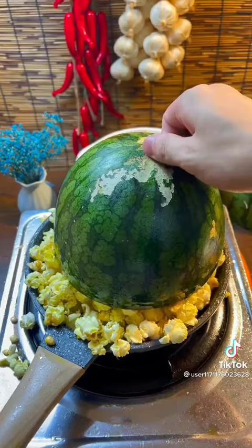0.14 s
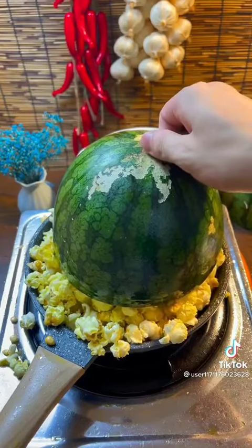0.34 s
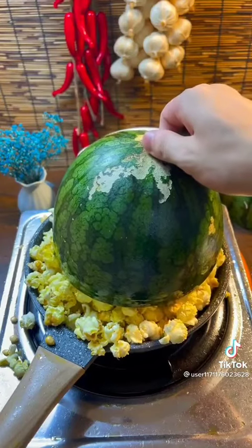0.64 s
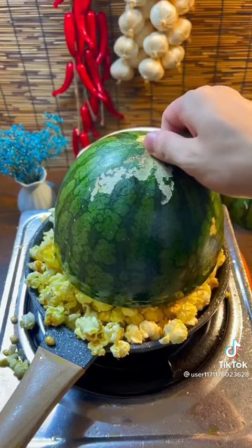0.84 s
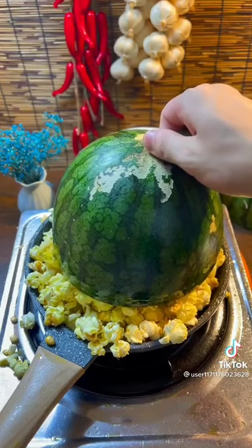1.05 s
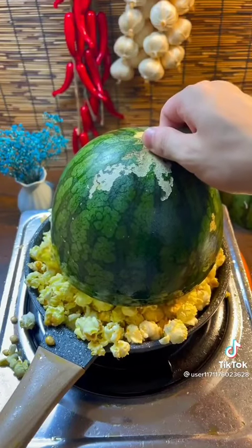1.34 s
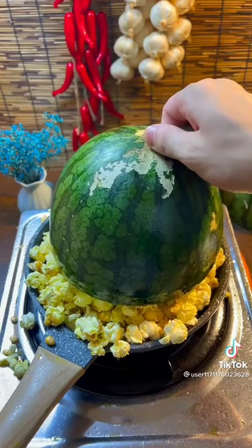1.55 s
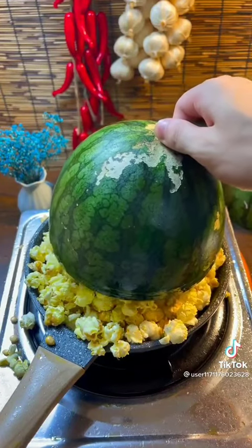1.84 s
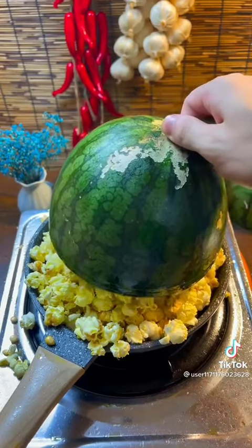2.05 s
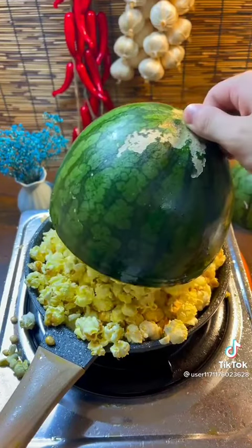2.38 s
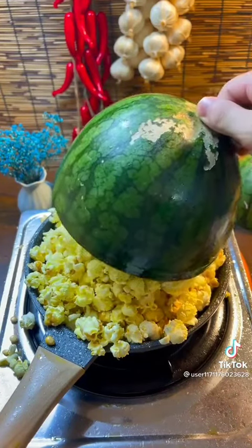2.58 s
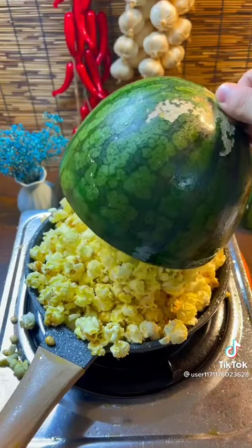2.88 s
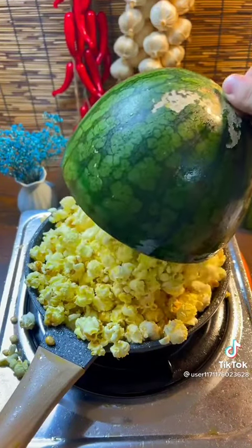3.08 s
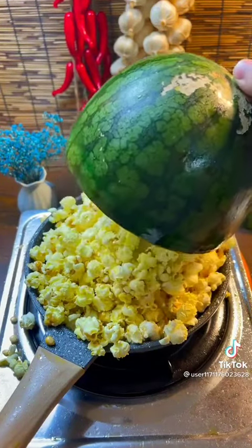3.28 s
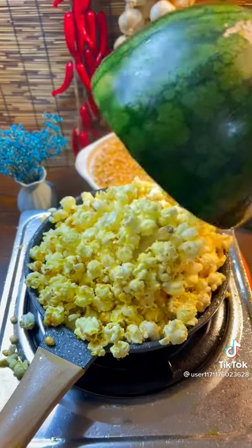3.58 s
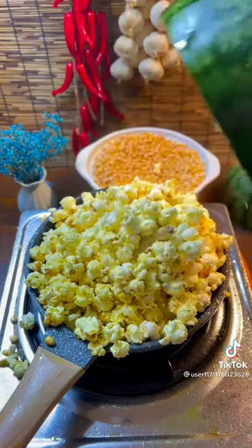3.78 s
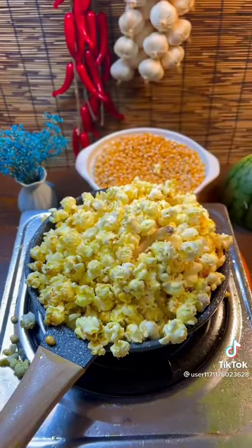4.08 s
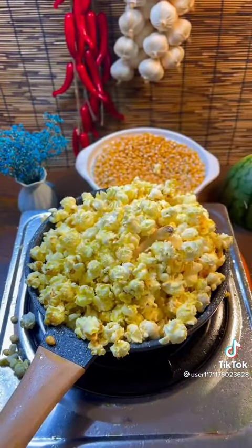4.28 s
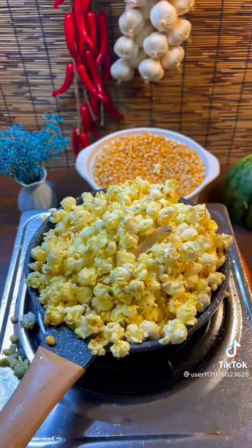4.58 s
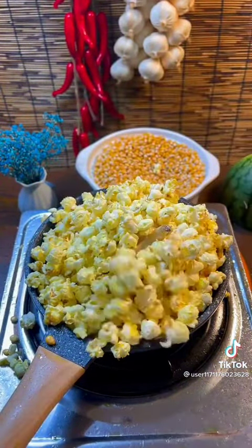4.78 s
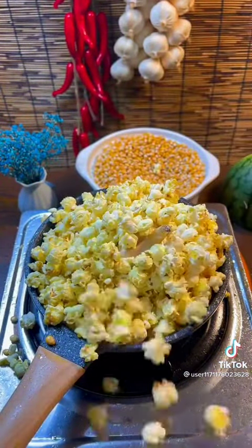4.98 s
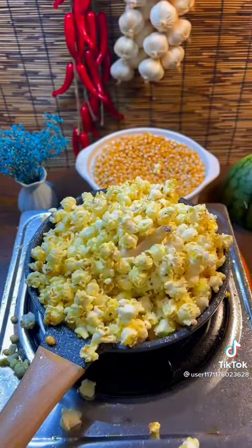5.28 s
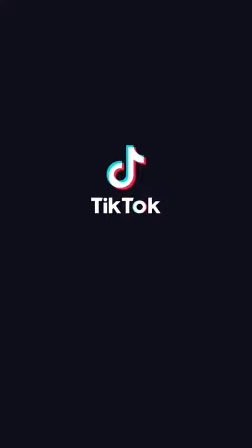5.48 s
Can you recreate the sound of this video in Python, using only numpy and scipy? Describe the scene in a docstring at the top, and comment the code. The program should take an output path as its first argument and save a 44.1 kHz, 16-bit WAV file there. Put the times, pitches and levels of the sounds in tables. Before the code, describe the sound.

A close phone capture in a small kitchen. A brief burst of oil sizzle opens it and drops within 0.2 s to a faint hiss with tiny spits, dry rustling and a low, wavering stove hum near 48 Hz. From 0.15 to 1.5 s small kernels crack softly and irregularly, each followed by a little hiss of jostling flakes; dry ticks come near 1.5 and 1.9 s. Pops thin out to about 2.9 s, with breathy swishes at the start and around 0.3, 1.5 and 3.3-3.8 s. A firmer cluster of cracks comes at 3.35-3.6 s, then near calm. At 4.43 s a very loud sharp double crack echoes briefly, a muffled thud follows at 4.71 s, and a lesser sharp crack at 4.92 s, each with a bass swell. From 5.0 to 5.3 s flakes slide in bright grainy hiss and ticks, drumming hollowly on sheet steel. They fade before an abrupt stop at 5.58 s.

```python
"""Popcorn in a hot pan on a stove in a small kitchen, close to a phone microphone.
From the start oil sizzles over dry rustling, a low stove rumble and airy swishes: all shaped noise, plus a hum.
Under a rind held as a lid, kernels crack softly: noise bursts ring resonances, then jostling flakes hiss.
Later, with the lid off, three loud pops (two sharp with echoes, one dull) throw flakes about; last, the heap
slides as grainy hiss and ticks, and flakes drum on the steel stove top, ringing its modes."""
import sys
import numpy as np
from scipy import signal
from scipy.fft import rfft, irfft
from scipy.io import wavfile
from scipy.ndimage import uniform_filter1d

SR = 44100
rng = np.random.default_rng(int(sys.argv[2]) if len(sys.argv) > 2 else 0)


def to_linear_factor(level_db):
    """Convert decibel levels (scalar or array-like) to linear amplitude factors."""
    exponent = np.asarray(level_db, float) / 20
    return 10 ** exponent


def put_to_file(sound):
    """Save the sound as 16-bit audio at rate SR, in the file named by the first command-line argument."""
    columns = np.atleast_2d(sound).T  # one column per channel
    safe = np.clip(columns, -1, 1)
    whole_steps = np.round(safe * 32767)
    wavfile.write(sys.argv[1], SR, whole_steps.astype(np.int16))


N = 248283
END_S = 5.578  # the recorder stops


def evened(x):
    """Scales to rms 1."""
    return x / np.sqrt(np.mean(x ** 2) + 1e-20)


def spectrum_at(points, hz):
    """Reads a spectrum table on a log-frequency axis."""
    f, value = np.transpose(points)
    return np.interp(np.log(hz + 1), np.log(f + 1), value)


def curve(rows, column=1):
    """One column of a table, read against its time column at every sample."""
    rows = np.array(rows)
    return np.interp(np.arange(N) / SR, rows[:, 0], rows[:, column])


def colour(x, points):
    """Filters by a spectrum table."""
    gain = to_linear_factor(spectrum_at(points, np.fft.rfftfreq(len(x), 1 / SR)))
    return irfft(rfft(x) * gain, len(x))


def add(mix, start_s, sound):
    """Lays a sound into the mix at start_s."""
    part = mix[round(start_s * SR):][:len(sound)]
    part += sound[:len(part)]


def play(mix, rows, sound, lead_s=0):
    """Lays in one sound per table row, lead_s early to leave room for its rise."""
    for start_s, *row in rows:
        add(mix, start_s - lead_s, sound(*row))


def ring(x, modes):
    """Passes x through fixed resonances of alternating sign."""
    out = np.zeros(len(x))
    for k, (hz, width_hz, db) in enumerate(modes):
        b, a = signal.iirpeak(hz, hz / max(width_hz, 5), SR)
        out += (-1) ** k * to_linear_factor(db) * signal.lfilter(b, a, x)
    return out


def grains(size, per_s, spread_db):
    """Sparse clicks of random sign, a few of them large."""
    draw = rng.random((size, 3))
    heights = to_linear_factor(-spread_db * np.log(np.maximum(draw[:, 0], .02)))
    return heights * np.sign(draw[:, 1] - .5) * (draw[:, 2] < per_s / SR)


def patchy(points, patchy_db, size=512):
    """Coloured noise whose short-time spectrum drifts in patches."""
    frames, hz = 4 * N // size + 5, np.fft.rfftfreq(size, 1 / SR)
    a, b, patches = rng.standard_normal((frames, len(hz), 3)).T
    patches = uniform_filter1d(patches, size=6, axis=0)
    patches = evened(uniform_filter1d(patches, size=10, axis=1))
    z = (a + 1j * b) * to_linear_factor(spectrum_at(points, hz)[:, None] + patchy_db * patches)
    return evened(signal.istft(z, nperseg=size, noverlap=3 * size // 4)[1][:N])


def drift(rate_hz):
    """Slow chance of rms 1: sines of random phase up to rate_hz, the slower ones stronger."""
    t = np.arange(N) / SR
    rates = np.geomspace(rate_hz / 10, rate_hz, 16)
    return evened(sum(np.sin(2 * np.pi * (f * t + rng.random())) / np.sqrt(f) for f in rates))


# how busy the pan is: time_s, sizzle_db, roar_db
SIZZLE = [(0.0, -45.5, -49.5), (0.07, -54, -54.5), (0.2, -62.5, -58.5), (0.38, -62.5, -58),
          (0.52, -68, -58.5), (1.2, -65.5, -57.5), (1.72, -68, -58.5), (2.3, -68, -61.5),
          (3.05, -69.5, -62.5), (3.33, -66, -58), (3.53, -61.5, -53), (3.87, -66.5, -59), (4.4, -72.5, -64),
          (4.6, -64, -59), (4.85, -69, -57), (4.98, -60, -54), (5.1, -52.5, -44.5), (5.24, -51.5, -48.5),
          (5.44, -68, -57.5), (5.58, -70.5, -58)]
# the hiss of hot oil near the microphone: freq_hz, level_db (per Hz)
SIZZLE_COLOUR = [(880, -21), (1500, -6), (1910, -14), (2380, -2), (2940, -4), (3820, -14), (4540, -7),
                 (5560, -11.5), (6360, -8), (10600, -12), (12300, -6.5), (14300, -17.5), (15000, -49.5)]


def sizzle():
    """Oil hiss with tiny spits; the fizz on top follows it, as steam and tumbling flakes come and go."""
    spit = rng.standard_normal(300) * np.exp(-np.arange(300) / 39.0)
    spits = signal.oaconvolve(grains(N, per_s=450, spread_db=5.5), spit)
    spits = evened(colour(spits[:N], SIZZLE_COLOUR))
    hiss = patchy(SIZZLE_COLOUR, patchy_db=2.5) + .45 * spits
    body = colour(hiss, [(5000, -0.5), (7000, -41.0)])
    fizz = evened(hiss - body)
    sizzle_db = curve(SIZZLE)
    fizz_db = -71 + 1.145 * (sizzle_db + 68.5)  # -71 dB when the sizzle is at a calm -68.5 dB
    return to_linear_factor(sizzle_db) * evened(body) + to_linear_factor(fizz_db) * fizz


def rustle():
    """Dry rubbing: noise in a broad band that rises and falls with the roar."""
    rustle_db = -71 + 1.14 * (curve(SIZZLE, column=2) + 62)  # -71 dB when the roar is at a calm -62 dB
    rubbing = [(200, -8), (500, 6.0), (1400, 1.5), (2000, -9.5), (4000, -38.0)]
    return to_linear_factor(rustle_db) * patchy(rubbing, patchy_db=1.8)


# low stove rumble before lumps and swells: time_s, level_db
RUMBLE = [(0.0, -46), (0.19, -48), (0.29, -55), (0.48, -50.5), (0.68, -61.5), (0.92, -49.5), (1.5, -48),
          (1.63, -59), (2.3, -57), (2.5, -54.5), (2.95, -58.5), (3.55, -53.5), (4.3, -60.5), (5.1, -51.5),
          (5.58, -51.5)]
# noise around the hum: freq_hz, level_db (per Hz)
RUMBLE_COLOUR = [(20, -12), (35, 1), (50, -1), (70, -2), (90, -9), (140, -35)]
# the flame's roar: freq_hz, level_db (per Hz)
ROAR_COLOUR = [(53, -43.5), (90, -15), (102, -8), (135, 3), (189, -4.5), (210, -9.5), (243, 2), (327, -7),
               (350, -5), (437, -10), (491, -14), (530, -14), (900, -16.5), (1170, -68.5), (1980, -120)]
# after each loud burst the phone's gate opens and the low rumble swells: start_s, level_db (at the top), swell_s
SWELLS = [(4.43, -38, 0.071), (4.712, -42, 0.028), (4.915, -37.5, 0.043)]


def stove():
    """A wavering low hum in lumpy noise, which swells after each loud burst, and the flame's dull roar."""
    t = np.arange(N) / SR
    hum_hz = 48.1 + 1.3 * drift(rate_hz=3)
    hum = np.sqrt(2) * np.sin(2 * np.pi * np.cumsum(hum_hz) / SR)
    level = to_linear_factor(curve(RUMBLE) + 1.5 * drift(rate_hz=9))  # lumps of 1.5 dB rms
    for start_s, db, swell_s in SWELLS:
        u = np.maximum(t - start_s, 0) / swell_s
        level = level + to_linear_factor(db) * (u * np.exp(1 - u)) ** 2
    rumble = level * evened(hum + 0.71 * patchy(RUMBLE_COLOUR, patchy_db=.6, size=4096))
    roar = to_linear_factor(curve(SIZZLE, column=2)) * patchy(ROAR_COLOUR, patchy_db=1.0, size=2048)
    return rumble + roar


def swish(length_s, level_db, first_hz, last_hz):
    """Airy and faintly whistling: noise in a narrow band that glides."""
    t = np.arange(0, length_s, 1 / SR)
    hz = first_hz + (last_hz - first_hz) * t / length_s
    turn = np.exp(2j * np.pi * np.cumsum(hz) / SR)
    r = np.exp(-np.pi * 300 / SR)
    # shift the band down to 0 Hz, smooth it there, shift it back
    low = signal.lfilter([(1 - r) ** 2], [1, -2 * r, r ** 2], rng.standard_normal(len(t)) / turn)
    return to_linear_factor(level_db) * evened((turn * low).real) * signal.windows.tukey(len(t), .6)


# airy swishes: start_s, length_s, level_db, first_hz, last_hz
SWISHES = [(0.0, 0.093, -54.5, 1470, 1400), (0.329, .22, -59.5, 1217, 1430), (1.531, 0.27, -64, 1130, 1390),
           (1.79, .09, -66.5, 830, 800), (3.271, 0.079, -64, 1520, 1530), (3.41, .09, -57, 1280, 1250),
           (3.61, 0.068, -60.5, 1110, 1070), (3.699, 0.19, -64, 1310, 1190)]


def swishes(mix):
    """Lays in every swish."""
    play(mix, SWISHES, swish)


# a bursting hull, two modes of crack and then three of hiss: freq_hz, width_hz, level_db
CRACK = [(2680, 890, 21), (4500, 400, -35), (6120, 1250, 1.5), (9000, 2100, -1), (12100, 1750, 4)]
# the heap under a burst: freq_hz, width_hz, level_db
THUMP = [(700, 500, -7), (1350, 210, -4)]


def pop(crack_db, thump_db, hiss_db, scatter_db):
    """The hull splits in a few ms of cracks; the heap thumps; flakes jostle and settle."""
    t = np.arange(SR // 4) / SR
    noise = rng.standard_normal((len(t), 3)).T
    rise = 1 - np.exp(-t / 0.0003)
    second = 0.3 * (t > .0035) * np.exp(-abs(t - .0035) / 0.0013)
    split = noise[0] * rise * (np.exp(-t / 0.0014) + second)
    crack = ring(split, CRACK[:2])
    hiss = ring(split, CRACK[2:])
    thump = ring(noise[1] * rise * np.exp(-t / 0.0073), THUMP)
    parts = ((0, crack), (thump_db, thump), (hiss_db, hiss))
    burst = sum(to_linear_factor(db) * v / abs(v).max() for db, v in parts)
    nudges = signal.lfilter([1], [1, -.985], abs(grains(len(t), per_s=160, spread_db=3.5)))
    jostle = evened(colour(noise[2], SIZZLE_COLOUR)) * evened(0.88 + nudges)
    settle = to_linear_factor(-60 * t / 0.12) * (1 - np.exp(-t / 0.0029))  # at rest (-60 dB) after 0.12 s
    return to_linear_factor(crack_db) * (burst + to_linear_factor(scatter_db) * jostle * settle)


# kernels bursting deep in the heap: start_s, crack_peak_db, then re the crack: thump_db, hiss_db,
# scatter_db (before it settles)
POPS = [(0.151, -35, -20, 5.5, -16), (0.1705, -39, -20, 8, -8.5), (0.1965, -47, -20, 1.5, -10),
        (0.2374, -47, -22, 3, -8), (0.4332, -46.5, -15, -2, -11), (0.4485, -43.5, -20, 7, -13),
        (0.5757, -31, -16, -9, -11.5), (0.623, -45.5, -13, 0, -11), (0.635, -45.5, -20, -8, -9),
        (0.7621, -39.5, -13, 4, -2.5), (0.9008, -41.5, -22, 4, -9), (0.9203, -39, -10.5, -3, -11),
        (0.9803, -42, -17, 4, -10), (1.0103, -40.5, -24, 2.5, -13), (1.0505, -45, -20, -3, -9),
        (1.1302, -36, -25, 6, -11), (1.211, -45, -20, 4.5, -9), (1.2458, -47, -20, 1.5, -5.5),
        (1.2703, -42.5, -20, 3, -5.5), (1.3167, -39.5, -20, 4, -12), (1.4326, -44, -14.5, -0.5, -13),
        (1.47, -48, -20, 4, -15), (1.488, -40.5, -23, 1, -5), (1.92, -48.5, -18, 6, -7),
        (2.0334, -48, -20, -6, -9), (2.1008, -38.5, -19, 0.5, -14.5), (2.127, -43, -12, 0, -5.5),
        (2.3786, -48, -17, 7.5, -7), (2.551, -48, -20, -13, -17), (2.66, -50, -18, -9, -19),
        (2.765, -50.5, -20, -2.5, -8), (2.851, -50, -20.5, 4, -11), (3.342, -33.5, -6.5, -3, -14),
        (3.3892, -33, -8.5, 0.5, -10), (3.42, -42.5, -17, -7, -5), (3.4655, -41.5, -20, 4, -5),
        (3.5848, -48, -18, 5.5, -11), (3.6127, -40, -20, 6.5, -14), (4.0761, -40.5, -17, 3, -10)]


def pops(mix):
    """Lays in the kernels in the heap, and 26 faint ones at its bottom at random moments."""
    play(mix, POPS, pop, lead_s=.0008)
    for when, size, bright in rng.random((26, 3)):
        add(mix, when * END_S, pop(-54.5 + 5 * size, -20, 12 * bright - 9, -11))


def tick(peak_db, centre_hz):
    """A few ms of bright noise, narrowed twice by one wide resonance."""
    t = np.arange(SR // 20) / SR
    mode = [(centre_hz, 0.86 * centre_hz, 0)]
    noise = rng.standard_normal(len(t)) * (1 - np.exp(-t / 0.0004)) * np.exp(-t / 0.0027)
    click = ring(ring(noise, mode), mode)
    return to_linear_factor(peak_db) * click / abs(click).max()


# dry flakes ticking on each other: start_s, peak_db, centre_hz
TICKS = [(1.469, -40, 11000), (1.498, -33.5, 12000), (1.512, -42, 4500), (1.92, -35, 10100),
         (1.93, -42, 9000), (2.397, -47, 11000), (4.09, -47, 10000), (4.688, -46, 8000), (4.89, -50, 7000),
         (4.949, -32, 4240), (5.045, -34, 11800), (5.062, -32, 12300), (5.078, -31, 12100),
         (5.097, -35, 11200), (5.236, -32, 11600), (5.254, -26.5, 11200), (5.263, -29, 12600),
         (5.42, -40.5, 11000)]


def ticks(mix):
    """Lays in every tick of flake on flake."""
    play(mix, TICKS, tick, lead_s=.0006)


# a loud burst in the open: freq_hz, level_db (per Hz)
BANG = [(59, -41), (100, -7.5), (513, -2.5), (1140, 1.5), (1840, -9.5), (2630, -1.5), (3840, -9.5),
        (6350, -14), (8000, -14.5), (9660, -11.5), (11900, -16), (13800, -18), (15000, -45.5)]
# the kitchen and pan answering a bang: freq_hz, level_db (per Hz)
SCATTER = [(18, -27), (30, -1.5), (132, -11), (158, -13), (228, 4.5), (267, -13.5), (552, -20), (859, -6),
           (1110, -4.5), (1780, -15), (2430, -10.5), (2990, -14), (9150, -25), (13900, -36.5),
           (15000, -64.5)]
# how long the echo lingers: freq_hz, factor on echo_t60_s
LINGER = [(50, 1.4), (250, 1.32), (1000, 1.15), (4000, 0.98), (12000, 1.0)]


def bang(peak_db, tilt_db, split_s, echo_db, t60_s):
    """A double crack, then a dense echo whose bass lingers longest, cut short after a sixth of a second
    by the phone's noise gate."""
    t = np.arange(SR // 2) / SR
    noise = rng.standard_normal((len(t), 2)).T
    fall_s = 0.33 * max(split_s, .001)
    cracks = sum(share * (t > s) * np.exp(-abs(t - s) / fall_s) for s, share in ((0, 1), (split_s, .45)))
    tilt = [(100, -3 * tilt_db), (12800, 4 * tilt_db)]
    burst = colour(colour(noise[0] * (1 - np.exp(-t / 0.00055)) * cracks, BANG), tilt)
    answer = evened(colour(colour(noise[1], SCATTER), tilt))
    hz, frame_s, z = signal.stft(answer, SR, nperseg=256)
    band_t60_s = np.maximum(t60_s * spectrum_at(LINGER, hz)[:, None], .01)
    echo = signal.istft(z * to_linear_factor(-60 * frame_s / band_t60_s), SR, nperseg=256)[1][:len(t)]
    gate = 1 / (1 + (t / .16) ** 6)
    echo = echo * (1 - np.exp(-t / 0.0028)) * gate
    return to_linear_factor(peak_db) * (burst / abs(burst).max() + to_linear_factor(echo_db) * echo)


# loud bursts in the open: start_s, peak_db (of the cracks), brightness_db (per octave), split_s,
# echo_db (re the peak, before decay), echo_t60_s
BANGS = [(4.4305, -4.5, .5, 0.0041, -16, .38), (4.9157, -13, 2, .0065, -15, 0.21)]


def bangs(mix):
    """Lays in the bursts in the open."""
    play(mix, BANGS, bang, lead_s=.0012)


# a burst muffled by the heap: freq_hz, level_db (per Hz)
THUD_COLOUR = [(35, -22), (60, 2.5), (129, -19.5), (199, -11.5), (289, -16), (469, -6), (982, -12),
               (1240, -3.5), (1560, -19.5), (1920, -17), (3120, -34), (4620, -25), (6380, -39.5),
               (12500, -38), (15000, -52)]


def thud(level_db, swell_s, echo_db, t60_s):
    """A muffled burst that swells for some ms and leaves a short dull echo."""
    t = np.arange(SR // 2) / SR
    shape = t / swell_s * np.exp(1 - t / swell_s) / (1 + (t / (2 * swell_s)) ** 4)
    shape += to_linear_factor(echo_db - 60 * t / t60_s) * (1 - np.exp(-t / swell_s))
    return to_linear_factor(level_db) * shape * evened(colour(rng.standard_normal(len(t)), THUD_COLOUR)) / 2


# the one dull burst buried in the heap: start_s, level_db (nominal peak), swell_s, echo_db, echo_t60_s
THUD = (4.712, -20, .006, -12, .3)


def buried_burst(mix):
    """Lays in the dull burst."""
    play(mix, [THUD], thud)


def tumble(mix):
    """The heap slides off the pan: bright, grainy hiss of flakes brushing past each other, and 14 ticks."""
    t = np.arange(N) / SR
    start_s, end_s, fade_s = 5.0, 5.27, .06
    sliding = np.clip(np.minimum(t - start_s, end_s - t) / fade_s + 1, 0, 1) ** 2
    brushing = [(3000, -29.5), (6500, -7), (9000, -3.5), (12000, 1), (14500, -8)]
    mix += to_linear_factor(-49.5) * sliding * patchy(brushing, patchy_db=4.5, size=256)
    for when, size, bright in rng.random((14, 3)):
        # later ticks tend to be weaker
        click = tick(-40 + 6 * size - 7 * when, 5000 + 7000 * bright)
        add(mix, np.interp(when, (0, 1), (start_s, end_s)), click)


# flakes landing on the steel top: start_s, peak_db (of the drumming)
LANDINGS = [(5.065, -30), (5.082, -19.5), (5.091, -26.5), (5.106, -29.5), (5.121, -25), (5.132, -25.5),
            (5.145, -25), (5.157, -19), (5.167, -23), (5.179, -29.5), (5.199, -27.5), (5.217, -21.5),
            (5.231, -27), (5.244, -24.5), (5.257, -28.5), (5.284, -33), (5.309, -36.5), (5.345, -40)]
# modes of the sheet steel: freq_hz, width_hz, level_db (before each spot's chance)
STEEL = [(229, 53, 2), (289, 45, 5), (397, 53, 2), (480, 50, 0), (727.7, 25, -4.5), (814, 56, -11),
         (1160, 60, -8), (1254, 45, -7.5), (1420, 53, -18), (1880, 180, -12.5), (2520, 220, -18)]


def landings(mix):
    """Each flake knocks the sheet steel at its own spot, so the modes answer unevenly; small bounces follow."""
    t = np.arange(SR // 4) / SR
    for start_s, db in LANDINGS:
        push = rng.standard_normal(len(t)) * (1 - np.exp(-t / 0.00062)) * np.exp(-t / 0.0042)
        knock = ring(ring(push, [(594, 1060, 0)]), [(695, 1450, 0)])
        hops = grains(len(t), per_s=300, spread_db=3) * to_linear_factor(-60 * t / 0.31)
        bounces = signal.oaconvolve(knock, hops)[:len(t)]
        spot = [(hz, width_hz, mode_db + 3 * rng.standard_normal()) for hz, width_hz, mode_db in STEEL]
        drum = ring(knock + to_linear_factor(-14) * bounces, spot) + to_linear_factor(-11) * knock
        crisp = ring(push, CRACK[:2])
        add(mix, start_s, to_linear_factor(db) * (drum / abs(drum).max() + to_linear_factor(-13) * crisp / abs(crisp).max()))


# left-right difference: freq_hz, level_db (re the centre)
SIDE_DB = [(3000, -90), (3900, -32.5), (5000, -15.5), (8000, -4.5), (14000, -7.5)]


def scene():
    """All sources near the centre; only the treble differs left from right."""
    mid = sizzle() + rustle() + stove()
    for lay_in in (swishes, pops, ticks, bangs, buried_burst, tumble, landings):
        lay_in(mid)
    z = signal.stft(colour(mid, SIDE_DB), nperseg=128)[2]
    # same envelope, unrelated phase
    turned = z * np.exp(2j * np.pi * rng.random(z.T.shape).T)
    side = signal.istft(turned, nperseg=128)[1][:N]
    return np.array([mid + side, mid - side])


def roll_off(x):
    """The treble ends steeply here."""
    return signal.sosfilt(signal.butter(12, 15550, fs=SR, output="sos"), x)


def record(dry):
    """The recorder's band limit, then its stop: a sudden drop and a steep fade."""
    lowpass = signal.firwin(255, 14320, window=("kaiser", 6), fs=SR)
    limited = signal.oaconvolve(dry, lowpass[None], "same")
    after_s = np.arange(N) / SR - END_S
    mix = limited * np.where(after_s > 0, to_linear_factor(-35.5 - 650 * after_s), 1)
    return roll_off(mix)


dry = scene()
out = record(dry)
put_to_file(out)
```